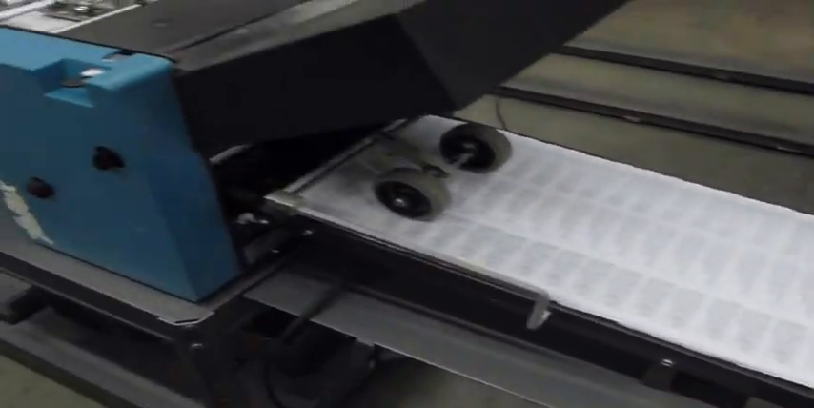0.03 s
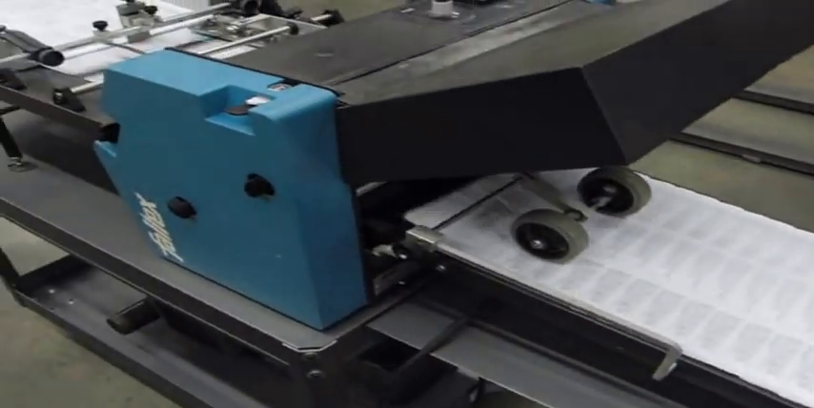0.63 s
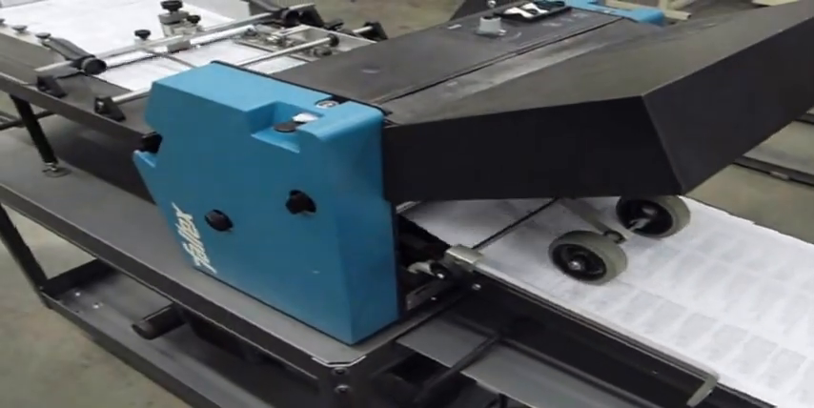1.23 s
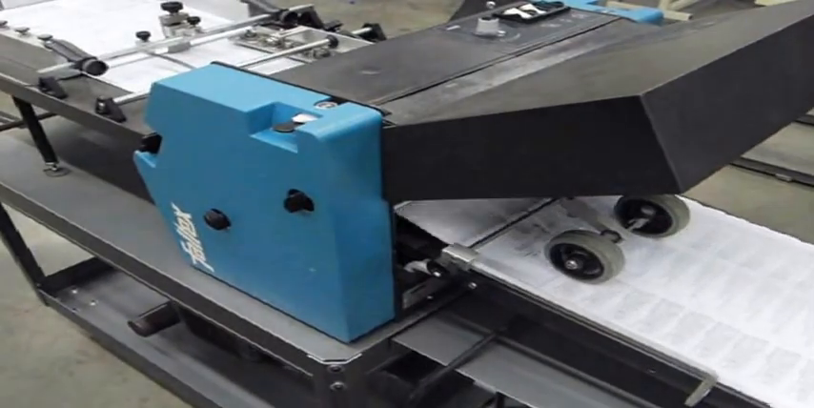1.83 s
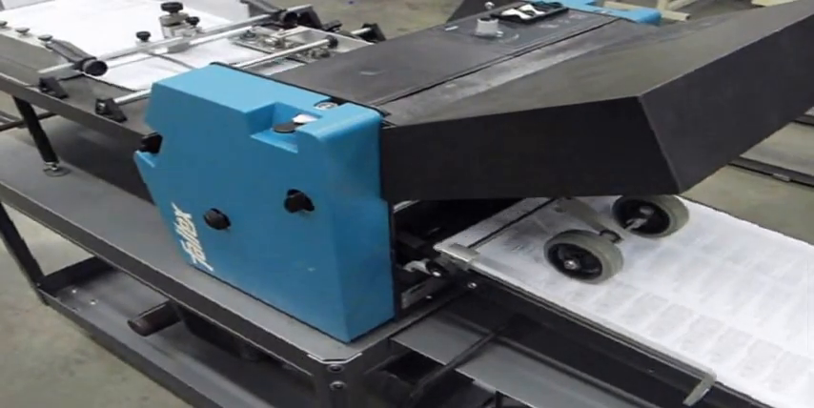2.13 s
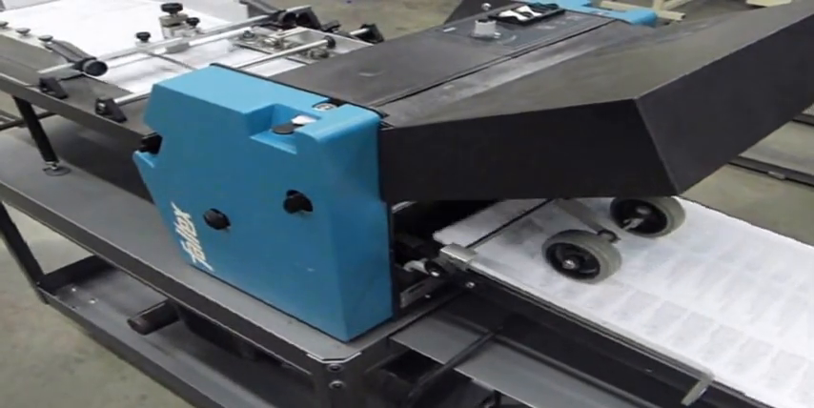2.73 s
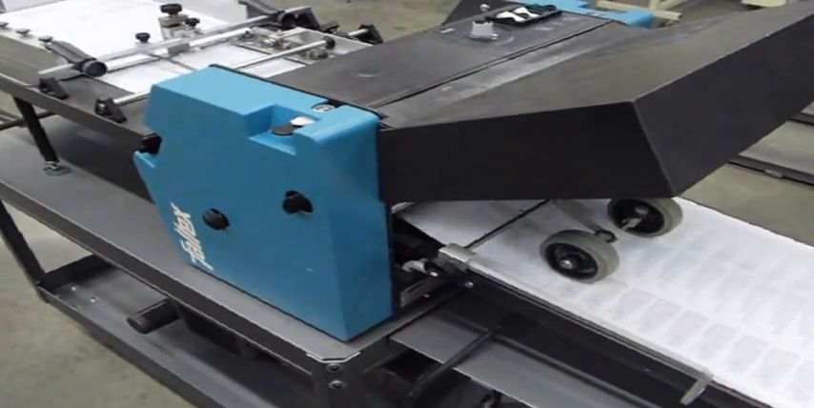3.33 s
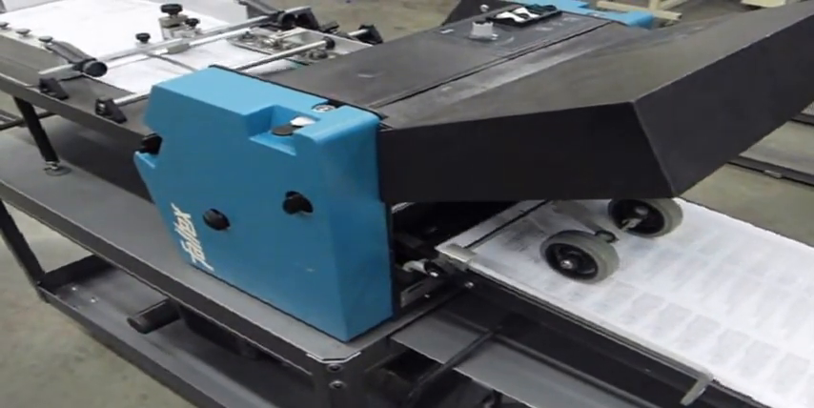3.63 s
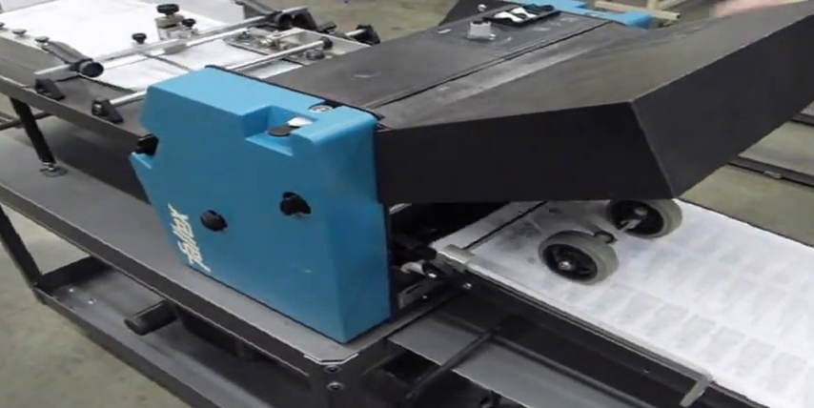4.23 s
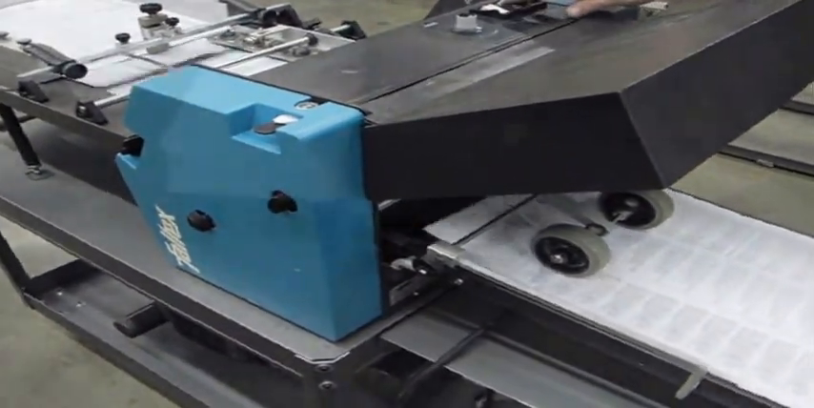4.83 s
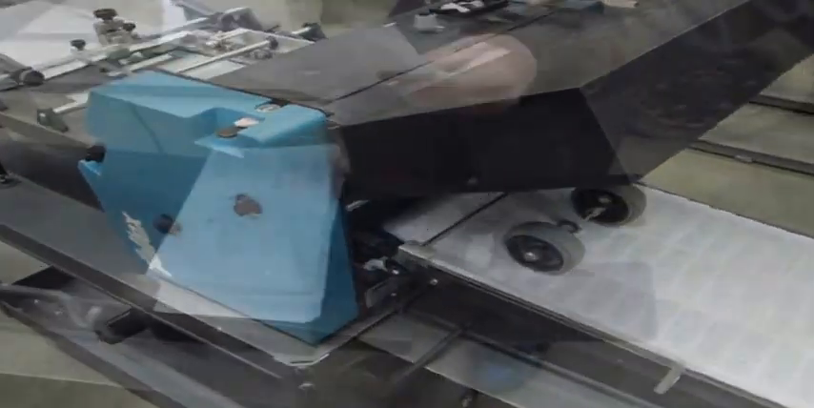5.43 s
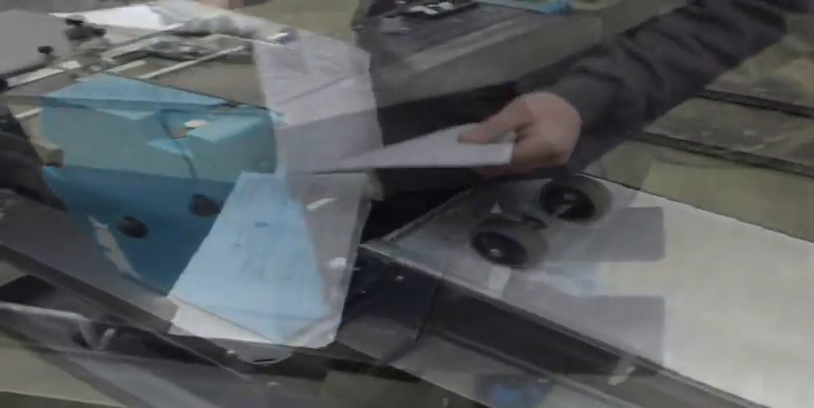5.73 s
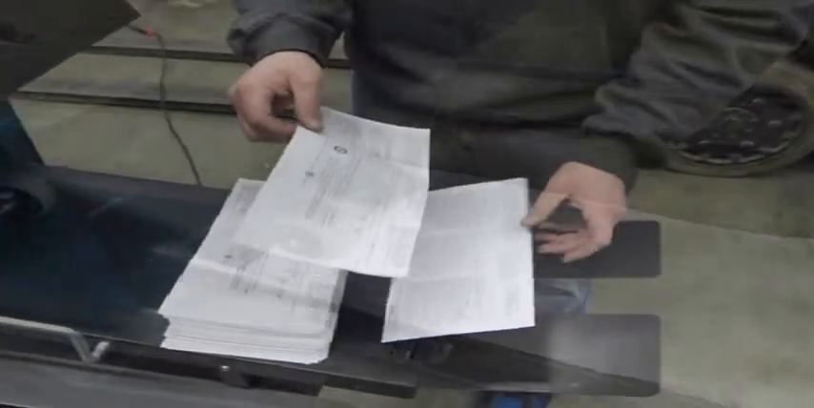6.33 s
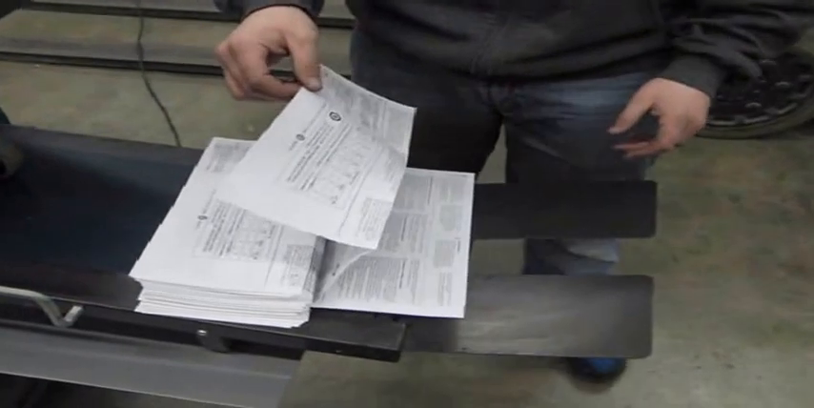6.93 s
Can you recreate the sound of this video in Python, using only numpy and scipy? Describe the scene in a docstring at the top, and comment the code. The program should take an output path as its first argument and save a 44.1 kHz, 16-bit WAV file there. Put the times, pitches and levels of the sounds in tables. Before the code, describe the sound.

A paper folding machine runs with rapid, even clacking, a hum and hissing paper, then stops and fades away.

```python
"""Paper folding machine in a print shop.

Nearly five sheets a second: the drive hums, rollers rattle and chirp, paper hisses. Each sheet
ticks and flaps out of the rollers, sets a steel plate ringing and clacks against the fold stop.
The run fades under a few last knocks, leaving a quiet workshop whirr that fades out too."""
import sys
import numpy as np
from scipy import signal
from scipy.io import wavfile

SR = 44100
rng = np.random.default_rng(int(sys.argv[2]) if len(sys.argv) > 2 else 0)


def digitize_waveform(pressure):
    """Quantize a signal to 16-bit integers and store it at the path in sys.argv[1].

    Rows of a 2-D input are taken as channels; values are limited to [-1, 1].
    """
    field = np.atleast_2d(pressure).T
    bounded = np.clip(field, -1, 1)
    quanta = np.round(bounded * 32767).astype(np.int16)
    wavfile.write(sys.argv[1], SR, quanta)


N = 308700
TIME = np.arange(N) / SR

# sheets hitting the fold stop: (time [s], level [dB])
SHEETS = [(0.161, -2.5), (0.372, -3.5), (0.583, -5), (0.79, -6), (1.002, -3), (1.214, -2.5), (1.426, -2.5),
          (1.636, -3), (1.842, -2.5), (2.055, -3.5), (2.264, -2.5), (2.481, -2.5), (2.691, -4),
          (2.902, -6.5), (3.111, -5.5), (3.315, -3.5), (3.524, -3.5), (3.733, -4), (3.951, -3.5),
          (4.161, -3.5), (4.368, -3.5), (4.576, -6.5), (4.787, -6), (4.995, -3.5), (5.202, -5),
          (5.405, -6.5), (5.61, -20.5)]
CLACK_S, CLACK_DB = np.transpose(SHEETS)
SHEET_PERIOD_S, FLAP_LEAD_S = 0.21, 0.070  # lead: roller exit to clack


def from_db(db):
    """Decibels to gain."""
    return 10 ** (np.asarray(db) / 20)


def rms_one(x):
    """Scale to rms 1."""
    return x / np.sqrt(np.mean(x ** 2) + 1e-20)


def white():
    """White noise."""
    return rng.standard_normal(N)


def drift(corner_hz):
    """Slow random wander, rms 1."""
    step, settle = 40, 2000
    r = np.exp(-2 * np.pi * corner_hz * step / SR)
    slow = signal.lfilter([1], [1, -2 * r, r * r], rng.standard_normal(N // step + settle + 2))[settle:]
    return np.interp(np.arange(N) / step, np.arange(len(slow)), rms_one(slow))


def resonate(x, modes):
    """Parallel resonances of alternating sign."""
    out = 0
    for k, (hz, width_hz, db) in enumerate(modes):
        r = np.exp(-np.pi * width_hz / SR)
        poles = [1, -2 * r * np.cos(2 * np.pi * hz / SR), r * r]
        out += (-1) ** k * from_db(db) * (1 - r * r) / 2 * signal.lfilter([1, 0, -1], poles, x + 1e-18)
    return out


def coloured(source, spectrum, flicker_db):
    """Flickering third-octave bands, fed alternately by two draws of the source; rms 1."""
    out, feeds, edges_hz = 0, [source(), source()], np.geomspace(28, 17000, 29)
    points_hz, points_db = np.transpose(spectrum)
    for k, (low, high) in enumerate(zip(edges_hz, edges_hz[1:])):
        band = signal.sosfilt(signal.butter(2, [low, high], "band", fs=SR, output="sos"), feeds[k % 2])
        db = np.interp(np.log(low * high) / 2, np.log(points_hz), points_db)
        out += band * from_db(db + flicker_db * drift(8.8))
    return rms_one(out)


def grains(per_s, spread_db):
    """Tiny random impacts of uneven size; rms 1."""
    sizes = from_db(spread_db * np.minimum(rng.exponential(1, N), 4))
    return rms_one(sizes * rng.choice([-1, 1], N) * (rng.random(N) < per_s / SR))


def bursts(times_s, levels_db, rise_s, fall_s):
    """Force rising and falling exponentially around each contact."""
    out = np.zeros(N)
    for s, db in zip(times_s, levels_db):
        near = slice(max(int((s - 0.1) * SR), 0), int((s + 0.2) * SR))
        t = TIME[near] - s
        out[near] += from_db(db) * np.exp(np.where(t < 0, t / rise_s, -t / fall_s))
    return out


def blows(times_s, levels_db):
    """One impulse per contact."""
    out = np.zeros(N)
    out[(np.asarray(times_s) * SR).astype(int)] = from_db(levels_db)
    return out


def swings(times_s, levels_db, hz, width_s):
    """A few sine cycles under a Gaussian at each time."""
    out = np.zeros(N)
    for s, db, phase in zip(times_s, levels_db, rng.random(len(times_s))):
        near = np.abs(TIME - s) < 0.05
        t = TIME[near] - s
        out[near] += from_db(db) * np.exp(-(t / width_s) ** 2) * np.sin(2 * np.pi * (hz * t + phase))
    return out


def fade(from_s, db_per_s):
    """Unity gain, then a steady fall."""
    return from_db(-db_per_s * np.maximum(TIME - from_s, 0))


def gate(end_s, release_s):
    """Unity gain, then a linear ramp to zero at end_s."""
    return np.clip((end_s - TIME) / release_s, 0, 1)


def running():
    """Gate that ends the running noise."""
    return gate(end_s=5.79, release_s=0.095)


def since_sheet(after_s):
    """Seconds since the latest clack time shifted by after_s."""
    marks_s = np.r_[CLACK_S[0] - 2 * SHEET_PERIOD_S, CLACK_S[0] - SHEET_PERIOD_S, CLACK_S] + after_s
    return TIME - marks_s[np.searchsorted(marks_s, TIME) - 1]


def each_sheet(after_s, width_s):
    """Unit Gaussian bump, after_s from each clack."""
    half_s = SHEET_PERIOD_S / 2
    return np.exp(-((since_sheet(after_s - half_s) - half_s) / width_s) ** 2)


def drive(hum_hz=242.3, level_db=-29):
    """Rough gear hum; sags as each sheet leaves, swells after the clack."""
    # gear harmonics: (multiple, level [dB], roughness [0-1])
    harmonics = [(1, -2, 0.13), (2, -16.5, 0.3), (3, -12.5, 0.3), (4, -16.5, 0.6), (5, -15, 1),
                 (6, -16.5, 0.7), (16, -18.5, 1)]
    cycles = np.cumsum(hum_hz * (1 + 0.00311 * drift(7.56))) / SR
    sag_db = 19 * each_sheet(after_s=0.0295 - FLAP_LEAD_S, width_s=0.012)
    swell_db = 2.5 * each_sheet(after_s=0.048, width_s=0.048)
    hum = 0
    for order, db, rough in harmonics:
        wobble = np.sqrt(1 - rough ** 2) + rough * (drift(19.4) + 1j * drift(15)) / np.sqrt(2)
        partial = np.real(wobble * np.exp(2j * np.pi * (order * cycles + rng.random())))
        hum += from_db(db + swell_db - sag_db / order) * partial
    return np.sqrt(2) * from_db(level_db) * fade(5.33, db_per_s=80) * running() * hum


def rollers(turn_hz=28.85, rattle_db=-25.5, squeak_db=-36, chirp_db=-38.5):
    """Bearings rattle, easing after each clack; once a turn a roller catches, chirps and squeaks."""
    # bearing rattle: (frequency [Hz], density [dB])
    spectrum = [(30, -23), (90, -24.5), (130, -13.5), (190, -4.5), (290, 2.5), (420, -3), (520, -4),
                (700, 2.5), (1050, -3), (1500, 1), (2300, 1), (3800, -7.5), (7000, -11.5), (10500, -32)]
    # catching roller: (frequency [Hz], width [Hz], gain [dB])
    chirp_modes = [(7200, 690, 2.5), (9030, 310, 1), (9220, 240, 3.5), (9980, 210, -10)]
    # rubbing roller: (frequency [Hz], width [Hz], gain [dB])
    squeak_modes = [(6970, 21, 6), (6400, 350, -23), (5040, 210, -9.5)]
    rattle = coloured(lambda: grains(per_s=1500, spread_db=4) + 0.62 * white(), spectrum, flicker_db=1)
    angle = 2 * np.pi * turn_hz * TIME
    catch = np.exp(3.5 * np.cos(angle - 1.45))
    rub = np.exp(2 * np.cos(angle - 1.3))
    chirp = rms_one(resonate(white() * catch, chirp_modes))
    squeak = rms_one(resonate(white() * rub * from_db(2 * drift(15)), squeak_modes))
    friction = from_db(chirp_db) * chirp + from_db(squeak_db) * squeak
    lull_db = 2.5 * each_sheet(after_s=0.042, width_s=0.039)
    metal = from_db(rattle_db - lull_db) * rattle + gate(end_s=5.38, release_s=0.24) * friction
    surge_db = 0.76 * np.cos(2 * np.pi * (TIME - 2.41) / 1.2)  # slow swell, period 1.2 s
    return from_db(surge_db) * fade(5.02, db_per_s=18) * running() * metal


def paper(hiss_db=1.5, whistle_db=-7, whistle_growth=1.8):
    """Sliding paper hisses, most when pushed into the stop; harder sliding brings out a whistle."""
    # sliding strength: (time [s], level [dB])
    slide = [(0, -28), (3.2, -26), (3.55, -23), (5.0, -23)]
    # paper hiss: (frequency [Hz], density [dB])
    spectrum = [(1500, -36.5), (2800, 8.5), (3800, 4), (4450, 8.5), (5200, 8.5), (6400, 4.5), (7400, -1),
                (8500, -19), (10400, -45.5), (12500, -20.5), (15500, -18)]
    # paper whistle: (frequency [Hz], width [Hz], gain [dB])
    modes = [(4040, 170, -1.5), (4440, 160, -0.53)]
    slide_db = np.interp(TIME, *np.transpose(slide))
    hiss = coloured(lambda: grains(per_s=5000, spread_db=4) + 0.55 * white(), spectrum, flicker_db=1.45)
    push_db = 3 * each_sheet(after_s=0, width_s=0.0077)
    hiss *= from_db(hiss_db + push_db) * fade(5.167, db_per_s=48)
    whistle = rms_one(resonate(white(), modes)) * fade(5.23, db_per_s=48)
    whistle *= from_db(whistle_db + whistle_growth * (slide_db - slide_db.max()))
    return from_db(slide_db) * running() * (hiss + whistle)


def ticks(lead_s=0.083, jitter_s=0.003, level_db=-15, spread_db=3, band_hz=(2000, 7000)):
    """Each sheet's edge ticks as it slips out of the rollers; one does so sharply."""
    late, louder = rng.standard_normal((len(SHEETS), 2)).T
    force = blows(CLACK_S - lead_s + jitter_s * late, CLACK_DB + level_db + spread_db * louder)
    sharp = blows(times_s=[1.34], levels_db=[-1])
    return signal.sosfilt(signal.butter(1, band_hz, "band", fs=SR, output="sos"), force + sharp)


def flaps(level_db=-23.5, spread_db=2.5):
    """Each leaving sheet pushes the air back and forth for a few cycles."""
    levels_db = rng.normal(level_db, spread_db, len(SHEETS))
    return swings(CLACK_S - FLAP_LEAD_S, levels_db, hz=202, width_s=0.011) * fade(5.05, db_per_s=55)


def plate(ring_hz=3221, scrape_db=-9, flutter_db=2.7):
    """Each sheet catches a steel plate three times: one wavering, dying note with a scraping edge."""
    # strikes: (time after clack [s], level [dB])
    strikes = [(-.039, 0), (-.008, -9.5), (0.06, -5)]
    # ring strength: (time [s], level [dB])
    strength = [(0, -32), (1.8, -27), (2.25, -23.5), (3.2, -28.5), (5.0, -26.5)]
    rub = sum(bursts(CLACK_S + after_s, np.full(len(SHEETS), db), rise_s=0.0042, fall_s=0.053)
              for after_s, db in strikes)
    # sharp at first touch, sagging as the contact eases
    bend_hz = 28 * np.exp(-since_sheet(strikes[0][0]) / 0.013)
    pitch_hz = ring_hz + bend_hz + 9 * drift(23.7)
    note = np.sqrt(2) * np.sin(2 * np.pi * np.cumsum(pitch_hz) / SR) * from_db(flutter_db * drift(35))
    scrape = rms_one(resonate(white() * rub, [(ring_hz, 160, 0)]))
    gain = from_db(np.interp(TIME, *np.transpose(strength))) * fade(5.18, db_per_s=12) * running()
    return gain * (rub * note + from_db(scrape_db) * scrape)


def clacks(body_db=-0.3, buckle_db=5, snap_db=7, tap_db=4):
    """Each sheet buckles and snaps against the stop, with lighter taps on its way through the fold."""
    # damped swings of the stop: (frequency [Hz], width [s], level [dB])
    body_modes = [(300, 0.0035, -17), (684, 0.0023, -12.5), (1255, 0.0026, -19.5), (1680, 0.0019, -21.5)]
    # crack at the stop: (frequency [Hz], width [Hz], gain [dB])
    crack_modes = [(2200, 380, 0), (3320, 1150, -4), (6000, 1110, -6.5), (11600, 15000, -38.5)]
    # light contacts: (time after clack [s], level re clack [dB])
    taps = [(-.084, -9), (-.048, -8), (0.012, -12), (.062, -3), (.105, -11.5)]
    # tap resonances: (frequency [Hz], width [Hz], gain [dB])
    tap_modes = [(1426, 330, -4), (2120, 140, -1.5), (3080, 1000, -7), (6890, 750, -5),
                 (11300, 18000, -33.5)]
    hit_s, count = CLACK_S + 0.0017, len(SHEETS)
    weight_db = CLACK_DB + rng.normal(body_db, 1.5, count)
    body = sum(swings(hit_s + 0.00099, weight_db + db, hz, width_s) for hz, width_s, db in body_modes)
    buckle = bursts(hit_s, CLACK_DB, rise_s=0.002, fall_s=0.003) * grains(per_s=18000, spread_db=1.5)
    snap = blows(hit_s, CLACK_DB)
    crack = resonate(from_db(buckle_db) * buckle + from_db(snap_db) * snap, crack_modes)
    tap_force = 0
    for after_s, db in taps:
        times_s = hit_s + rng.normal(after_s, 0.00092, count)
        levels_db = CLACK_DB + rng.normal(db, 2.1, count)
        tap_force += bursts(times_s, levels_db, rise_s=0.00071, fall_s=0.0043)
    return body + crack + from_db(tap_db) * resonate(tap_force * white(), tap_modes)


def clunks():
    """Now and then the frame answers a sheet with a short hollow ring."""
    # frame clunks: (time [s], level [dB])
    hits = [(1.281, -20), (1.349, -17.5), (1.490, -26), (3.029, -17.5)]
    return swings(*np.transpose(hits), hz=1450, width_s=0.0016)


def workshop(air_db=-41.5, ring_db=-44.5, full_s=5.57, swell_s=1.0, motor_hz=55.6, motor_db=-71.5):
    """Idling machinery: a whirr rises as the run ends, then ebbs, over a faint motor hum."""
    # whirr: (frequency [Hz], density [dB])
    spectrum = [(30, -39), (100, -30), (200, 8.5), (300, 2.5), (450, -10.5), (600, 5.5), (1100, 2.5),
                (1900, -1), (3300, -1.5), (4400, -9), (6500, -8.5), (8500, -36), (11000, -34), (15500, -38)]
    # machinery resonances: (frequency [Hz], width [Hz], gain [dB])
    modes = [(221, 13, 1.5), (386, 14, 3.5), (568, 27, 5.5), (680, 54.6, -8), (793, 47, -1), (1850, 120, 0),
             (3260, 55, 3.5), (6560, 94, -13), (9800, 150, -24.5), (13050, 150, -36)]
    air = from_db(air_db) * coloured(white, spectrum, flicker_db=0)
    ring = from_db(ring_db) * rms_one(resonate(white(), modes))
    swell = np.clip(1 + (TIME - full_s) / swell_s, 0, 1)
    motor = from_db(motor_db) * np.sqrt(2) * np.sin(2 * np.pi * motor_hz * TIME)
    return swell * fade(full_s, db_per_s=14) * (air + ring) + fade(full_s, db_per_s=9) * motor


def knocks(level_db=5, tail_db=-17, snap_db=15, low_cut_hz=170):
    """A few last hard knocks, each dying away quickly; the first is a tap of the sheet that clacks at 5.405 s."""
    # knocks: (time [s], level [dB])
    hits = [(5.465, -22), (5.595, -12.5), (5.657, -17.5), (5.704, -22.5)]
    # metal resonances: (frequency [Hz], width [Hz], gain [dB])
    modes = [(610, 790, -2), (1410, 200, 1), (2060, 470, 0), (3300, 130, 4), (3960, 870, -7.5),
             (6500, 1300, -5), (12200, 4900, -28)]
    times_s, db = np.transpose(hits)
    times_s = times_s + 0.00117
    force = bursts(times_s, db, rise_s=0.00048, fall_s=0.0056)
    force += bursts(times_s, db + tail_db, rise_s=0.0005, fall_s=0.0084)
    ring = from_db(level_db) * resonate(force * white() + from_db(snap_db) * blows(times_s, db), modes)
    return signal.sosfilt(signal.butter(2, low_cut_hz, "high", fs=SR, output="sos"), ring)


def room(x, t60_s=0.46, wet_db=-12, wall_hz=4500):
    """Adds a short diffuse tail, dulled by the walls."""
    t = TIME[:SR // 2]
    tail = rng.standard_normal(len(t)) * from_db(-60 * t / t60_s) * (t > 0.006)
    tail = signal.sosfilt(signal.butter(1, wall_hz, fs=SR, output="sos"), tail)
    return x + from_db(wet_db) * signal.fftconvolve(x, tail / np.linalg.norm(tail))[:N]


def scene():
    """The machine close by, its impacts echoing in the workshop; mono."""
    machine = drive() + flaps() + rollers() + paper() + plate()
    impacts = clacks() + clunks() + knocks() + ticks()
    return (machine + room(impacts) + workshop())[None]


def record(dry):
    """Four treble notches, soft clipping, fade to silence, steep low-pass."""
    # treble cuts: (frequency [Hz], width [Hz])
    notches = [(2700, 380), (5000, 640), (5700, 584), (7860, 600)]
    for hz, width_hz in notches:
        dry = signal.lfilter(*signal.iirnotch(hz, hz / width_hz, fs=SR), dry)
    low_pass = signal.ellip(12, 0.1, 80, 15850, fs=SR, output="sos")
    return signal.sosfilt(low_pass, gate(end_s=6.82, release_s=0.25) * np.tanh(dry))


dry = scene()
out = record(dry)
digitize_waveform(out)
```